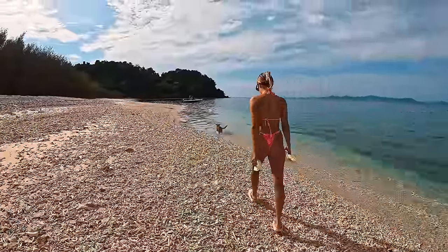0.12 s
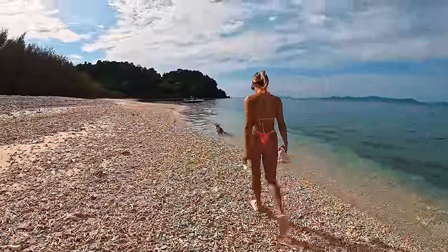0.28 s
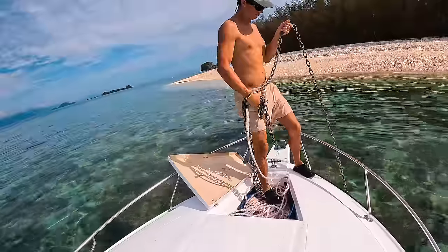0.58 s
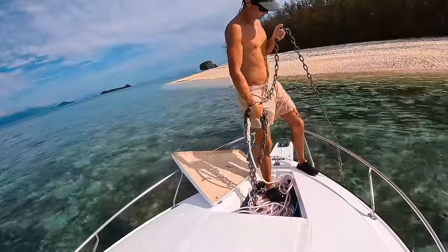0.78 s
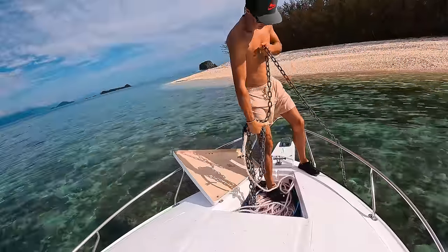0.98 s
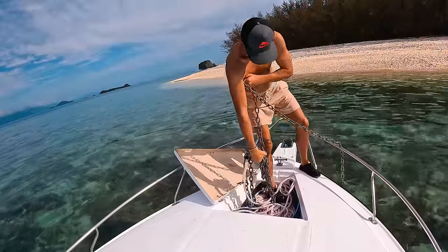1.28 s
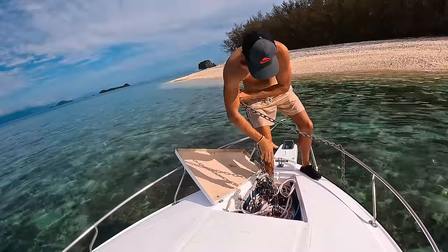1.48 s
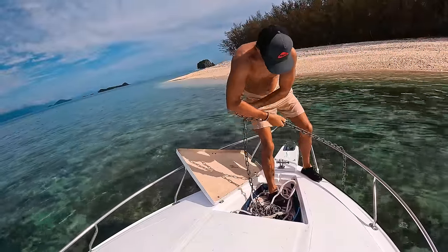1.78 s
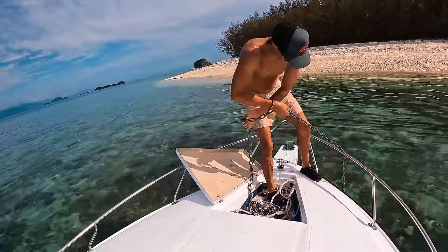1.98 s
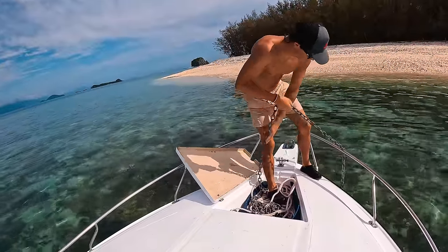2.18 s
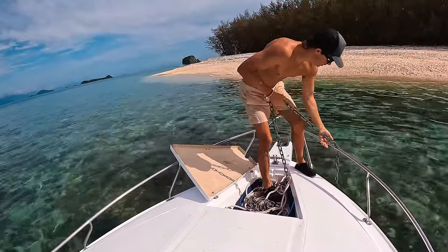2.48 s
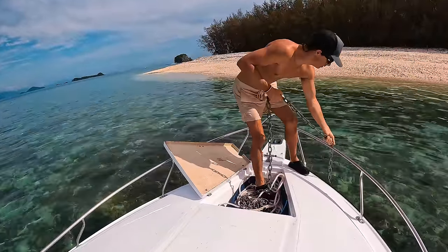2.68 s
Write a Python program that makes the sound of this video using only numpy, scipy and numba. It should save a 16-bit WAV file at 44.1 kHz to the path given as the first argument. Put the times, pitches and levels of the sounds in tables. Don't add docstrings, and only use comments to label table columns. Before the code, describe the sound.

A steel chain is hauled on a small boat. First, until 0.5 s, soft shell and pebble crunching with small knocks, then a brief silence. From 0.6 s faint ticks and scrapes; clinks thicken from 0.9 s into a loud, bright rattling rush around 1.45-1.7 s. Hollow knocks hit the well at 1.85-2.1 s, then scattered clinks thin out to 2.8 s over faint water. Close, dry, nearly mono.

```python
import sys
import numpy as np
from scipy import signal
from scipy.fft import rfft, irfft
from scipy.io import wavfile
from scipy.ndimage import uniform_filter1d
from numba import njit

SR = 44100
rng = np.random.default_rng(int(sys.argv[2]) if len(sys.argv) > 2 else 0)


def amplitude_ratio(level_db):
    exponent = np.asarray(level_db, float) / 20
    return 10 ** exponent


def wav_record(signal):
    frames = np.transpose(np.atleast_2d(signal))
    bounded = np.clip(frames, -1, 1)
    quanta = np.round(bounded * 32767).astype(np.int16)
    wavfile.write(sys.argv[1], SR, quanta)


N = 125685

# time in seconds, jingling level in dB.
SHAKE_LEVEL = [(0.61, -62), (0.64, -54.5), (0.83, -64), (0.93, -42.5), (1.09, -32.5), (1.15, -22),
               (1.38, -30.5), (1.5, -17.5), (1.65, -16), (1.91, -76), (1.96, -27), (2.1, -30.5),
               (2.16, -62), (2.24, -37.5), (2.62, -55), (2.73, -66), (2.81, -74), (2.84, -77)]
# start in seconds, peak in dB.
HAUL_CLINKS = [(0.639, -35), (0.715, -34), (0.8663, -32.5), (0.9206, -24), (0.9306, -28), (0.9526, -29),
               (0.9648, -21), (0.9781, -34), (0.9965, -15.5), (1.0657, -18.5), (1.0975, -27), (1.1051, -27),
               (1.1219, -14.5), (1.1394, -9.5), (1.1584, -13), (1.1643, -10.5), (1.1785, -17), (1.195, -14),
               (1.21, -30), (1.2268, -18), (1.2386, -28), (1.252, -22), (1.275, -8), (1.303, -25),
               (1.3143, -16), (1.3276, -30), (1.3817, -20), (1.391, -11), (1.4089, -20.5), (1.416, -25),
               (1.4226, -20), (1.4388, -8), (1.4625, -5), (1.481, 0), (1.4949, -4), (1.5035, -5),
               (1.5147, -3.5), (1.528, -3.5), (1.5455, -6), (1.5588, -5), (1.5679, -3.5), (1.579, -5),
               (1.589, 0), (1.6102, -2), (1.62, -8), (1.6323, -5.5), (1.6429, -9), (1.6586, -3.5),
               (1.6744, -12.5), (1.687, -27), (1.694, -15), (1.7124, -21), (1.7427, -22), (1.7491, -23),
               (1.76, -23), (1.7675, -21), (1.7858, -33), (1.8132, -32)]
# start in seconds, peak in dB.
DROP_CLINKS = [(1.849, -44), (1.9362, -23), (1.9564, -15), (2.0391, -20.5), (2.0778, -19), (2.1789, -40),
               (2.1966, -30), (2.2326, -23), (2.2782, -19), (2.3333, -15.5), (2.373, -16.5),
               (2.4235, -24.5), (2.4543, -32.5), (2.4893, -37), (2.5034, -25.5), (2.5645, -25.5),
               (2.5732, -23.5), (2.6053, -28), (2.6244, -31), (2.799, -34)]
LINK_MODE_HZ = [11610, 11740, 12250, 12540]
# level in dB, 60 dB decay time in seconds.
LINK_MODES = [(-2.5, 0.057), (-0.5, 0.037), (-4, 0.045), (-11, 0.1)]
# start in seconds, level in dB.
LINK_TICKS = [(0.6087, -40), (0.6435, -41), (0.715, -39), (0.7595, -55), (0.821, -54.5), (0.9208, -42),
              (0.9265, -40), (0.9628, -34), (0.969, -50), (0.997, -40.5), (1.0074, -39), (1.0136, -35),
              (1.0533, -44.5), (1.0664, -39), (1.098, -39), (1.1047, -35), (1.119, -32.5), (1.1342, -32.5),
              (1.1512, -31), (1.164, -30), (1.1984, -31), (1.204, -42), (1.2125, -34), (1.262, -54),
              (1.2706, -29), (1.2754, -35), (1.2866, -36), (1.3024, -38.5), (1.3163, -46), (1.381, -34),
              (1.4359, -29), (1.454, -25.5), (1.4591, -27.5), (1.4675, -35), (1.4805, -26.5), (1.485, -24),
              (1.5466, -21), (1.6221, -6), (1.7408, -38), (1.757, -42.5), (1.7817, -45), (1.7948, -61),
              (1.8123, -53), (1.856, -46.5)]
# frequency in Hz, density in dB per Hz.
TICK_COLOUR = [(1500, -26.5), (3000, -17), (6000, -10), (9000, -6.5), (11500, 2), (13000, -0.5),
               (14500, -24), (17000, -38)]
# start in seconds, blow in dB, ring of the well in dB, hull boom in dB.
WELL_KNOCKS = [(1.461, -48, -42, -38.5), (1.600, -43.5, -37, -31), (1.8492, -24.5, -24.5, -35),
               (1.8539, -20.5, -26, -38.5), (1.8582, -42, -29.5, -37), (1.9476, -8, -3, -25),
               (1.9672, -15, -13.5, -27), (1.9774, -15, -15, -34), (1.9884, -24, -25, -35.5),
               (2.002, -34, -29, -31.5), (2.01, -34, -36, -31.5), (2.037, -9, -11.5, -31.5),
               (2.0437, -24, -28, -34.5), (2.0483, -36, -40, -51), (2.0938, -8, -12.5, -36.5),
               (2.644, -38, -35.5, -45), (2.727, -52, -51, -37)]
# frequency in Hz, level in dB, 60 dB decay time in seconds.
WELL_MODES = [(905, -0.5, 0.021), (1500, 4, 0.02), (1764, -0.5, 0.021), (2120, -4, 0.021),
              (2490, -13, 0.012), (3470, 2.5, 0.012), (4070, -3, 0.013), (4500, -6.5, 0.014),
              (5960, -13, 0.0139)]
# frequency in Hz, level in dB, 60 dB decay time in seconds.
HULL_MODES = [(63.5, -17, 0.1), (134, -1.5, 0.22), (182, -1, 0.12), (253, -3.5, 0.09), (330.2, -5.5, 0.13),
              (482, -2.5, 0.051)]
# start in seconds, frequency in Hz, level in dB.
HEAP_THUDS = [(1.571, 121, -51), (1.59, 69.4, -28.5), (1.6, 166.4, -25.5), (1.627, 240, -34),
              (1.626, 95, -33), (1.643, 180, -42), (1.711, 141, -40.5), (1.798, 140, -39),
              (1.865, 317, -34.5), (1.863, 134, -35.5), (1.922, 121, -30), (1.976, 290, -30),
              (2.005, 408, -31), (2.031, 356, -30.5), (2.056, 312, -35), (2.129, 129, -43),
              (2.471, 141, -42.5), (2.729, 537, -36.5), (2.74, 312, -37), (2.841, 89, -29)]
# start in seconds, level in dB, length in seconds, centre in Hz.
DECK_SCRAPES = [(0.606, -28, 0.0097, 2800), (0.643, -25.5, 0.017, 2500), (0.757, -39.5, .015, 3000),
                (1.849, -34.5, 0.016, 8500), (1.855, -26.5, 0.012, 2360), (1.999, -30, 0.016, 2390),
                (2.315, -38, 0.035, 1920), (2.691, -39, 0.014, 1590), (2.714, -23.5, 0.0036, 1300),
                (2.724, -28.5, 0.018, 1300), (2.799, -43, 0.0035, 4500), (2.848, -32, 0.008, 1490)]
# time in seconds, crunch level in dB.
CRUNCH_LEVEL = [
    (0, -50),
    (.096, -50),
    (.12, -44),
    (.136, -51),
    (.205, -42),
    (.225, -50),
    (.3, -51.5),
    (.47, -57),
    (.51, -50.5),
]
# start in seconds, peak in dB.
PEBBLE_HITS = [
    (0.0543, -25),
    (0.118, -14),
    (0.3082, -25.5),
    (0.4015, -36),
    (0.4259, -30),
    (0.4444, -31),
    (0.4714, -25),
    (0.5067, -56.5),
]
# frequency in Hz, density in dB per Hz.
GRAVEL_COLOUR = [(88, -19), (150, 1.5), (221, -6), (631, -3), (2270, -11), (7000, -13), (12000, -12.5),
                 (15500, -19.5)]
# start in seconds, frequency in Hz, level in dB.
SHELL_RINGS = [
    (0.055, 15200, -23),
    (0.25, 7000, -35),
    (.258, 7050, -32),
    (0.307, 7060, -32.5),
    (.507, 1136, -31),
    (.51, 2070, -32),
]
# centre in seconds, pressure, length in seconds.
AIR_GUSTS = [
    (0.211, -0.14, 0.014),
    (0.241, 0.15, 0.022),
    (0.304, -0.054, 0.029),
    (0.373, -0.12, 0.011),
    (0.409, 0.05, 0.038),
]
# frequency in Hz, density in dB per Hz.
WATER_COLOUR = [(18, -31.5), (30, 1.5), (40, -16.5), (70, -19.5), (541, -31), (611, -30), (1780, -33),
                (4940, -46), (10000, -49.5), (13000, -81), (22000, -120)]
# time in seconds, level in dB.
LAPPING_LEVEL = [(.61, -44.5), (.7, -50.5), (.9, -53.5), (1.27, -58), (1.84, -55.5), (1.99, -52.5),
                 (2.3, -55.5), (2.52, -57), (2.84, -59)]

BOOM_RISE_S = 0.0035
BACK_S = 0.5942


def unit(x):
    return x / np.sqrt(np.mean(x ** 2))


def curve(rows):
    return np.interp(np.arange(N) / SR, *np.array(rows).T)


def samples(s):
    return (s * SR).astype(np.int64)


def band(x, hz, width_hz):
    edges = np.clip([hz - width_hz / 2, hz + width_hz / 2], 5, SR / 2.2)
    return signal.sosfilt(signal.butter(1, edges, "band", fs=SR, output="sos"), x)


def walk(rate):
    k = int(SR / rate)
    held = np.repeat(rng.standard_normal(N // k + 1), k)
    return 2.62 * uniform_filter1d(uniform_filter1d(held, k), k)[:N]


def colour(x, points):
    hz, db = np.array(points).T
    f = np.maximum(np.arange(1025) * SR / 2048, 1)
    cepstrum = irfft(np.log(amplitude_ratio(np.interp(np.log(f), np.log(hz), db))))
    cepstrum[1:1024] *= 2
    cepstrum[1025:] = 0
    return signal.fftconvolve(x, irfft(np.exp(rfft(cepstrum))))[:N]


@njit
def rings(size, start, hz, t60, gain, rise, sr):
    y = np.zeros(size)
    q = np.exp(-1 / (rise * sr))
    for k in range(len(start)):
        p = np.exp(2j * np.pi * hz[k] / sr - np.log(1000) / (t60[k] * sr))
        z, lack = gain[k] + 0j, 1.
        for i in range(start[k], min(size, start[k] + int(t60[k] * sr))):
            lack *= q
            y[i] += z.imag * (1 - lack)
            z *= p
    return y


def strike(s, db, modes, spread, mode_db, rise_s):
    hz, level_db, t60 = np.array(modes).T
    r = rng.standard_normal((len(s), 3, len(hz)))
    gain = amplitude_ratio(db[:, None] + level_db + mode_db * r[:, 0]) * np.sign(r[:, 2])
    detuned_hz = hz * (1 + spread * r[:, 1])
    decay_s = t60 * amplitude_ratio(2 * r[:, 2])
    start = np.repeat(samples(s), len(hz))
    return rings(N, start, detuned_hz.ravel(), decay_s.ravel(), gain.ravel(), rise_s, 1. * SR)


def bursts(s, db, tail_s):
    pulses = np.bincount(samples(s), amplitude_ratio(db), N)[:N]
    return signal.lfilter([1], [1, -np.exp(-1 / (tail_s * SR))], pulses) * rng.standard_normal(N)


def shaken(per_s, spread_db):
    r = rng.random((int(per_s * N / SR), 2))
    s = r[:, 0] * (N - 1) / SR
    rare = -np.log(1 - .98 * r[:, 1])
    return s, curve(SHAKE_LEVEL)[samples(s)] + spread_db * rare


def chain():
    bounce_s, bounce_db = 0.0063, -7.5
    jingle_s, jingle_db = shaken(600, 2.5)
    clink_s, clink_db = np.array(HAUL_CLINKS + DROP_CLINKS).T
    clink_db = clink_db - 5.5
    late = np.cumsum(bounce_s * (.3 + rng.random((len(clink_s), 2))), axis=1).T
    s = np.concatenate([clink_s, *(clink_s + late), jingle_s])
    db = np.concatenate([clink_db, clink_db + bounce_db, clink_db + 2 * bounce_db, jingle_db - 10])

    loose = np.arange(len(s)) >= late.size + len(clink_s)
    hauled = s < DROP_CLINKS[0][0]
    tick_db = db - 1 + np.where(loose, -5.5, -12 * hauled)
    tick_db = tick_db + 3.8 * rng.standard_normal(len(s))
    lone_s, lone_db = np.array(LINK_TICKS).T
    lone_db = np.minimum(lone_db, -27) + 10.5
    ticks = bursts(s, tick_db, 0.00084) + bursts(lone_s, lone_db, 0.0025)

    modes = np.column_stack([LINK_MODE_HZ, LINK_MODES])
    ring = strike(s, db, modes, spread=.005, mode_db=3., rise_s=0.0018)
    return ring + colour(ticks, TICK_COLOUR)


def rush():
    noise = rng.standard_normal(N)
    top_hz, width_hz = 14150, 2635.0
    top = unit(band(band(noise, top_hz, width_hz), top_hz, width_hz))
    shake_db = curve(SHAKE_LEVEL)
    hiss = unit(colour(noise, TICK_COLOUR)) + amplitude_ratio(-2.5 + .5 * shake_db) * top
    return hiss * amplitude_ratio(1.78 * shake_db + 0.5)


def knocks():
    s, blow_db, db, boom_db = np.array(WELL_KNOCKS).T
    each = np.ones(len(s))
    blow_hz, blow_t60_s, blow_rise_s = 2750, .0026, .0005
    blow = rings(N, samples(s), blow_hz * each, blow_t60_s * each, amplitude_ratio(blow_db + 8.5), blow_rise_s, 1. * SR)
    crack = band(band(bursts(s, db - 18, .001), 2530.0, 5100.0), 2700.0, 5200.)
    rattle = band(band(bursts(s, db - 6, .004), 2800., 3800.0), 2800., 3800.0)
    ring = strike(s, db - 12, WELL_MODES, spread=.01, mode_db=1.8, rise_s=0.00054)
    boom = strike(s, boom_db, HULL_MODES, spread=0.072, mode_db=3.4, rise_s=BOOM_RISE_S)
    return ring + blow + crack + rattle + boom + tumble()


def tumble():
    s, db = shaken(150, 0.91)
    modes = HULL_MODES + [(675, -1, 0.06), (95, -4.5, 0.12)]
    return strike(s, 1.83 * db - 16.5, modes, spread=0.15, mode_db=2.8, rise_s=BOOM_RISE_S)


def thuds():
    s, hz, db = np.array(HEAP_THUDS).T
    decay_cycles = 28.2
    return rings(N, samples(s), hz.copy(), decay_cycles / hz, amplitude_ratio(db), BOOM_RISE_S, 1. * SR)


def scrapes():
    grit = (rng.random(N) < .05) * rng.standard_normal(N) + 0.97 * rng.standard_normal(N)
    grit = unit(grit)
    out = np.zeros(N)
    for s, db, length_s, hz in DECK_SCRAPES:
        drag = np.abs(bursts(np.array([s]), np.array([db]), length_s)) * grit
        out += band(band(drag, hz, hz), hz, hz)
    return out


def gravel():
    grains_per_s, spread_db = 5000, 2.5
    hit = rng.random(N) < grains_per_s / SR
    grains = hit * rng.standard_normal(N) * amplitude_ratio(spread_db * rng.exponential(size=N))
    grains = grains + 0.5 * rng.standard_normal(N)
    bed = unit(colour(grains, GRAVEL_COLOUR)) * amplitude_ratio(curve(CRUNCH_LEVEL) + 3.0 + 1.66 * walk(59.4))
    low_grind = amplitude_ratio(-52) * unit(band(rng.standard_normal(N), 940.0, 1330.0))
    s, db = np.array(PEBBLE_HITS).T
    pebbles = band(bursts(s, db - 9.5, .002), 10260.0, 5200.0)
    return bed + low_grind + pebbles


def shells():
    s, hz, db = np.array(SHELL_RINGS).T
    t60_s, rise_s = .018, 0.00075
    return rings(N, samples(s), hz.copy(), np.full(len(s), t60_s), amplitude_ratio(db), rise_s, 1. * SR)


def gusts(t):
    return sum(p * np.exp(-.5 * ((t - s) / w) ** 2) for s, p, w in AIR_GUSTS)


def water():
    bed = unit(colour(rng.standard_normal(N), WATER_COLOUR))
    low = band(bed, 203.0, 199.0) * amplitude_ratio(-11 + 5.8 * walk(12))
    lap = band(bed, 987.0, 1525.0) * amplitude_ratio(1.3 * walk(25))
    hiss = band(bed, 7960.0, 11280.0) * amplitude_ratio(4 + .8 * walk(30))
    return (low + lap + hiss) * amplitude_ratio(curve(LAPPING_LEVEL) + 5)


def rumble():
    hz = 11.2
    return amplitude_ratio(-34.5) * unit(band(band(rng.standard_normal(N), hz, 9.1), hz, 9.))


def microphone_sag(t):
    depth, drop_s, recover_s = -0.28, 0.094, 1.008
    drop = np.sin(np.pi / 2 * np.clip((t - BACK_S) / drop_s, 0, 1)) ** 2
    return depth * np.exp(-np.maximum(t - BACK_S, 0) / recover_s) * drop


def scene():
    t = np.arange(N) / SR
    beach_end_s, fade_out_s, fade_in_s = 0.52, 0.014, 0.069
    out = np.sin(np.pi / 2 * np.clip((beach_end_s - t) / fade_out_s, 0, 1))
    back = np.clip((t - BACK_S) / fade_in_s, 0, 1)
    low = rumble()
    sag = microphone_sag(t)
    beach = gravel() + shells() + gusts(t) + low
    boat = chain() + rush() + thuds() + knocks() + scrapes() + water() + low
    mid = out * beach + back * boat + sag

    lagged = np.roll(band(mid, 1800, 4400.0), shift=60)
    patches = np.clip(4 * (walk(30) - 1.), 0, 1)
    side = amplitude_ratio(-27) * lagged * patches
    side = side + (amplitude_ratio(-.3 / 2) - 1) * (sag + back * low)
    return mid + side * np.array([[1], [-1]])


def roll_off(x):
    return signal.sosfilt(signal.butter(12, 16230, fs=SR, output="sos"), x)


def record(dry):
    top_hz = 15900
    lowpass = signal.ellip(8, .2, 70, top_hz, fs=SR, output="sos")
    mix = signal.sosfilt(lowpass, dry)
    return roll_off(mix)


dry = scene()
out = record(dry)
wav_record(out)
```